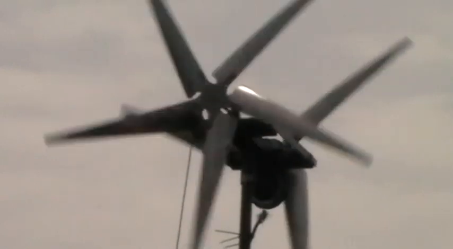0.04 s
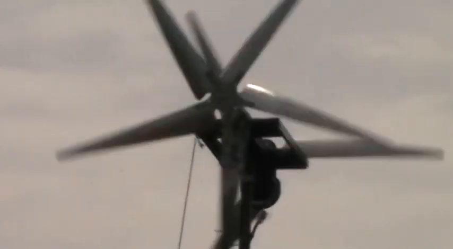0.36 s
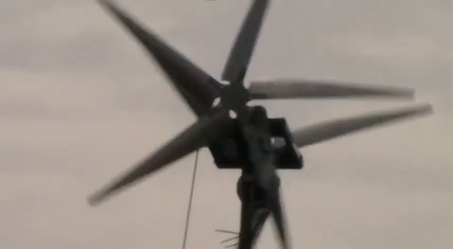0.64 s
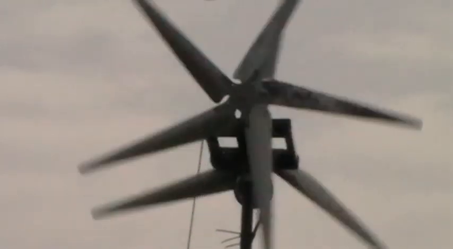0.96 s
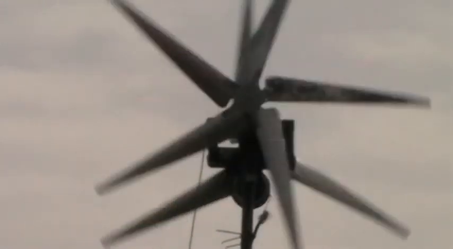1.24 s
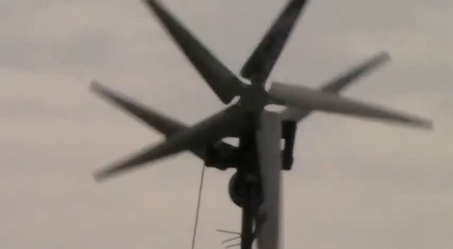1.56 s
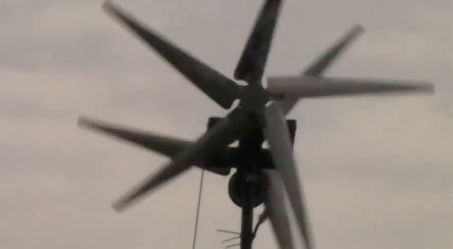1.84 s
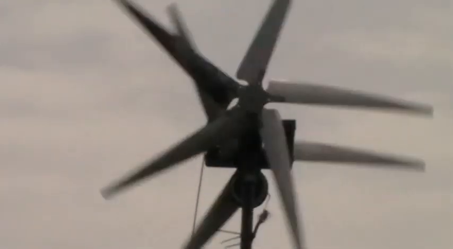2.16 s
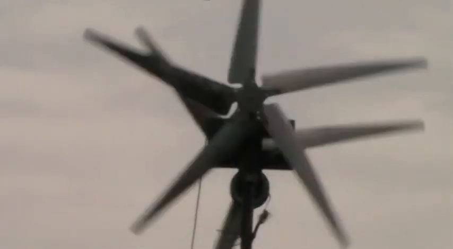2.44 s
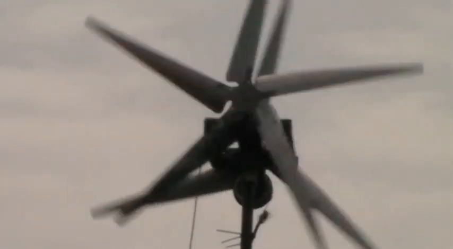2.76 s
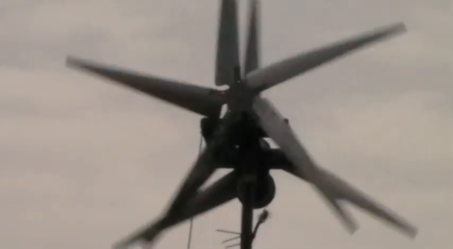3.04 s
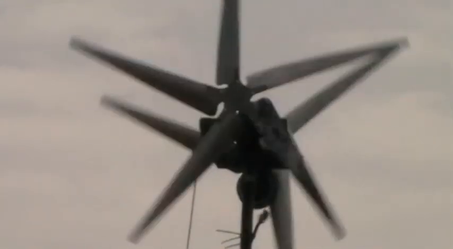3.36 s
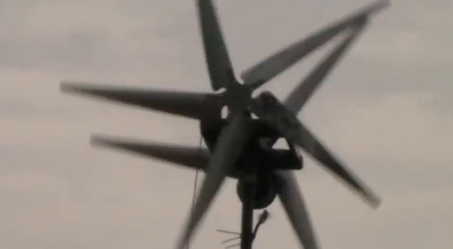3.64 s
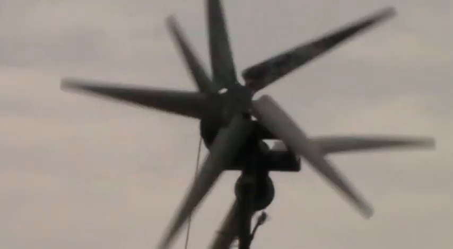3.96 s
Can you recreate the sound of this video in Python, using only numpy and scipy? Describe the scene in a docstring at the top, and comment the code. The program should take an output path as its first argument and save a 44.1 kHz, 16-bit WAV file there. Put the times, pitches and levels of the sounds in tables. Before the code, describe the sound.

A gust of wind buffets the microphone outdoors beside a small wind turbine, whose rotor gives one soft swish and a faint two-pitched ring. The rumble fades with two faint ticks, leaving soft airy hiss and occasional puffs.

```python
"""A long gust of wind rumbles and flutters on a microphone's two ports, then only single puffs arrive.
Large eddies make the rumble, small ones the flutter, and lone vortices land as thumps.
Behind them the air hisses steadily and a small home-made wind turbine turns: rubbing in its rotor
swishes once and keeps it ringing faintly at two pitches. Two faint high ticks come as the gust fades."""
import sys
import numpy as np
from scipy import signal
from scipy.fft import rfft, irfft
from scipy.io import wavfile
from scipy.ndimage import uniform_filter1d

SR = 44100
rng = np.random.default_rng(int(sys.argv[2]) if len(sys.argv) > 2 else 0)


def digitize_waveform(pressure):
    """Quantize a signal to 16-bit integers and store it at the path in sys.argv[1].

    Rows of a 2-D input are taken as channels; values are limited to [-1, 1].
    """
    field = np.atleast_2d(pressure).T
    bounded = np.clip(field, -1, 1)
    quanta = np.round(bounded * 32767).astype(np.int16)
    wavfile.write(sys.argv[1], SR, quanta)


N = 176400
TIME = np.arange(N) / SR
BIN_HZ = np.maximum(np.arange(N // 2 + 1) * SR / N, 1)


def undb(db):
    """Decibels to gain."""
    return 10 ** (np.asarray(db) / 20)


def unit(x):
    """Scale to rms 1."""
    return x / np.sqrt(np.mean(x ** 2))


def curve(rows, column=1):
    """One column of a table, joined by straight lines in time."""
    rows = np.array(rows)
    return np.interp(TIME, rows[:, 0], rows[:, column])


def colour(x, points):
    """Filter by a spectrum of (Hz, dB) points."""
    hz, db = np.array(points).T
    gain = undb(np.interp(np.log(BIN_HZ), np.log(hz), db))
    return irfft(rfft(x) * gain, N)


def shelf(x, kind, hz, gain):
    """Scale the low or high part of a sound by a moving gain."""
    band = signal.sosfiltfilt(signal.butter(2, hz, kind, fs=SR, output="sos"), x)
    return x + (gain - 1) * band


def noise():
    """White noise."""
    return rng.standard_normal(N)


def ring(hz, width_hz):
    """Noise in one steep-sided resonance, rms 1."""
    detuning = (BIN_HZ - hz) / (width_hz / 2)
    return unit(irfft(rfft(noise()) / (1 + detuning ** 2), N))


def flicker(db, rate_hz):
    """A gain that wavers at random by about db."""
    return undb(db * np.interp(TIME * rate_hz, np.arange(N), noise()))


def ports(source, mid_spectrum, side_spectrum):
    """Left and right from a shared (mid) and an opposed (side) part, rms 1."""
    mid, side = colour(source(), mid_spectrum), colour(source(), side_spectrum)
    return unit(np.array([mid + side, mid - side]))


def even(x, window_s=0.019):
    """Hold turbulence at a steady strength, so that the flow can set its level."""
    size = int(window_s * SR)
    power = np.mean(x ** 2, axis=0)
    return x / np.sqrt(uniform_filter1d(uniform_filter1d(power, size), size) + 1e-9)


def eddies(per_second=3000, spread_db=2):
    """Pressure kicks of random time, sign and size."""
    kicks = (rng.random(N) < per_second / SR) * np.sign(noise())
    return kicks * undb(spread_db * rng.exponential(size=N))


def wind_strength():
    """Rumble and flutter envelopes: each buffet adds its power to the underlying flow."""
    # The flow between buffets. Each row: time in seconds, rumble level in dB.
    flow = [(0, -34.5), (.42, -30), (.455, -42), (.51, -27), (.685, -23.5), (.72, -42), (.77, -42),
            (1.14, -29), (1.24, -51), (1.48, -42), (1.6, -50), (1.8, -55), (2.15, -45.5), (4, -51)]
    # Each row: centre in seconds, length in seconds, rumble in dB, flutter in dB.
    buffets = [(.005, 0.013, -25.5, -42), (0.08, 0.025, -27.5, -34), (0.15, 0.0097, -21.5, -31.5),
               (0.224, 0.0077, -18.5, -31), (0.254, 0.015, -24, -30), (0.302, 0.057, -23.5, -30),
               (.412, 0.02, -18, -27.5), (0.522, 0.033, -19, -24), (0.588, 0.043, -17.5, -23),
               (0.638, 0.022, -29, -29), (0.67, 0.022, -18.5, -19.5), (0.751, 0.015, -18, -25),
               (0.79, 0.031, -22.5, -27.5), (0.817, 0.017, -19, -19.5), (0.867, 0.048, -23.5, -22.5),
               (0.904, 0.028, -19, -29.5), (0.946, .02, -17, -17.5), (0.976, 0.016, -19, -18),
               (1.023, 0.033, -19.5, -17.5), (1.083, 0.046, -19, -23.5), (1.131, 0.017, -30.5, -26.5),
               (1.16, 0.013, -11.5, -22.5), (1.199, 0.069, -31.5, -45), (1.275, .024, -31.5, -61),
               (1.341, 0.052, -31, -59), (1.417, 0.017, -26, -32.5), (1.453, 0.018, -18, -38.5),
               (1.506, 0.035, -36, -46), (1.577, 0.01, -55, -36.5), (1.829, 0.026, -45, -71),
               (1.885, 0.022, -43.5, -71), (2.016, 0.034, -40.5, -67), (2.23, 0.11, -37.5, -50),
               (2.299, 0.0095, -31, -22.5), (2.328, 0.033, -34.5, -42), (2.577, 0.034, -37, -56),
               (2.847, 0.037, -33.5, -61), (3.122, 0.042, -37, -54), (3.335, 0.031, -39.5, -66),
               (3.459, 0.018, -37.5, -51), (3.515, .023, -30.5, -40)]
    squareness = 2.26  # 2 is a bell, more is flatter with steeper edges
    rumble_power = undb(curve(flow)) ** 2
    flutter_power = rumble_power * undb(-10) ** 2
    for at, length, rumble_db, flutter_db in buffets:
        near = abs(TIME - at) < 2 * length
        swell = .5 ** (abs(2 * (TIME[near] - at) / length) ** squareness)
        rumble_power[near] += swell * undb(rumble_db) ** 2
        flutter_power[near] += swell * undb(flutter_db) ** 2
    return np.sqrt(rumble_power), np.sqrt(flutter_power)


def buffeting():
    """Large eddies rumble on the ports; small ones ride on them and flutter when the flow is strong."""
    # Spectra of the turbulence. Each row: frequency in Hz, relative level in dB.
    rumble_mid = [(20, -20), (60, -2.5), (105, 3), (180, 4), (340, -9), (500, -26.5), (2500, -68)]
    rumble_side = [(20, -29), (110, -3), (200, -1.5), (340, -10.5), (500, -23), (2500, -64.5)]
    flutter_mid = [(100, -11), (250, 2.5), (380, -4), (600, -15), (1700, -28), (2500, -38), (8000, -86)]
    flutter_side = [(100, -41), (330, 2), (600, -4.5), (1600, -17), (2100, -27.5), (2800, -42), (8000, -78)]
    ride_depth, knee = 0.54, undb(-23.5)  # the shelves are flat at the knee level
    rumble_level, flutter_level = wind_strength()
    rumble = even(ports(eddies, rumble_mid, rumble_side))
    ride = uniform_filter1d(np.mean(rumble ** 2, axis=0) ** (ride_depth / 2), size=90)
    flutter = even(ports(eddies, flutter_mid, flutter_side) * ride)
    # Weaker flow makes larger, deeper eddies; stronger flow makes finer, brighter ones.
    rumble = even(shelf(rumble, "low", hz=123, gain=(rumble_level / knee) ** -0.52))
    flutter = shelf(flutter, "high", hz=990, gain=(flutter_level / knee) ** 0.73)
    return rumble_level * rumble + flutter_level * flutter


def air_hiss():
    """Hiss of the wind further off, with a top treble that swells and flickers on its own."""
    # Fader moves. Each row: time in seconds, level in dB before a fixed boost.
    body_fader = [(0, -58.5), (.6, -61.5), (1.0, -60.5), (1.55, -58), (3.5, -58), (3.92, -55.5)]
    treble_fader = [(0, -67.5), (.6, -67.5), (1.0, -66), (1.3, -64), (1.4, -60), (1.47, -65.5), (1.58, -63),
                    (1.75, -66), (3.0, -66), (3.95, -63.5)]
    # Spectra of the hiss. Each row: frequency in Hz, relative level in dB.
    body_mid = [(30, 9), (100, 4.5), (350, 15), (700, 12), (1100, 7.5), (2000, 3), (3300, 2), (5000, -1.5),
                (6700, -4), (9000, -13.5), (15000, -19.5)]
    body_side = [(30, -6), (150, -15), (500, -1.5), (1000, 1), (2000, -3.5), (4000, -9), (6000, -23.5),
                 (15000, -53)]
    treble_mid = [(4000, -14), (7000, -0.5), (8500, 2), (10500, 0), (13000, -6), (15500, -10)]
    treble_side = [(6000, -57), (8000, -6), (10000, -5), (13000, -2.5), (15500, -5)]
    body = undb(curve(body_fader) + 11) * ports(noise, body_mid, body_side)
    treble = undb(curve(treble_fader) + 3.5) * ports(noise, treble_mid, treble_side)
    return body + treble * flicker(db=0.9, rate_hz=45)


def rotor_rings():
    """Uneven rubbing in the turning rotor keeps two resonances ringing."""
    # Each row: pitch in Hz, width in Hz.
    resonances = [(2350, 81), (2712, 61)]
    # Each row: time in seconds, level of the lower ring in dB, level of the upper ring in dB.
    ring_levels = [(0, -59, -68), (.1, -53.5, -50.5), (.25, -50.5, -61.5), (.42, -60, -66),
                   (1.2, -68.5, -67), (1.72, -61.5, -57.5), (2.8, -67.5, -65), (3.22, -58.5, -64.5),
                   (4, -76, -71)]
    rings = np.zeros(N)
    for column, (hz, width_hz) in enumerate(resonances, start=1):
        level = undb(curve(ring_levels, column))
        rings += level * ring(hz, width_hz) * flicker(db=1.2, rate_hz=14)
    return rings


def rotor_swish(centre_s=0.095, length_s=0.18, peak_db=-53.5):
    """One rub of the rotor: a soft swell of bright noise."""
    # Each row: frequency in Hz, relative level in dB.
    rub_spectrum = [(1900, -17), (2400, 2), (2800, -4), (3300, -7), (6500, -10), (9300, -9), (11500, -26)]
    swell = undb(peak_db) * np.exp(-2 * ((TIME - centre_s) / length_s) ** 2)
    return swell * unit(colour(noise(), rub_spectrum))


def vortex_thumps():
    """Lone vortices strike both ports: suction at the core, pressure on either side."""
    # Each row: centre in seconds, half width in seconds, peak in dB.
    vortices = [(.409, 0.00076, -16), (.675, 0.00066, -15), (.811, 0.00091, -12.5), (.94, 0.0011, -13.5),
                (2.221, 0.0015, -20.5), (2.303, 0.002, -14), (3.035, 0.0021, -23.5), (3.119, 0.00204, -24),
                (3.237, .0022, -29.5)]
    pressure = np.zeros(N)
    for at, half_width, db in vortices:
        offset = (TIME - at) / half_width
        pressure += undb(db) * (offset ** 2 - 1) * np.exp(-offset ** 2 / 2)
    return pressure


def high_ticks(decay_s=.005):
    """Two faint ticks of high noise that start sharply and die at once."""
    # Each row: start in seconds, level in dB.
    ticks = [(1.115, -51), (1.268, -56.5)]
    envelope = sum(undb(db) * (TIME > at) * np.exp(-abs(TIME - at) / decay_s) for at, db in ticks)
    return envelope * ring(hz=11000, width_hz=9000)


def scene():
    """Wind on the ports in front of the air and the turbine."""
    # The side the wind strikes from. Each row: time in seconds, left minus right in dB.
    wind_side = [(0, -2.5), (1.2, -0.5), (2.2, 1)]
    balance_db = curve(wind_side)
    pan = undb(np.array([balance_db, -balance_db]) / 2)
    wind = pan * (buffeting() + vortex_thumps())
    return wind + air_hiss() + rotor_rings() + rotor_swish() + high_ticks()


def record(dry):
    """The microphone has three narrow dips and a steep top cut."""
    # Each row: centre in Hz, width in Hz, depth from 0 to 1.
    notches = [(2494, 164, 0.48), (5720, 127, 0.9), (7210, 210, 0.7)]
    dips = [1 - depth * np.exp(-((BIN_HZ - hz) / width) ** 2) for hz, width, depth in notches]
    notched = irfft(rfft(dry) * np.prod(dips, axis=0), N)
    top_cut = signal.ellip(10, .2, 80, 15550, fs=SR, output="sos")
    return signal.sosfilt(top_cut, notched)


dry = scene()
out = record(dry)
digitize_waveform(out)
```